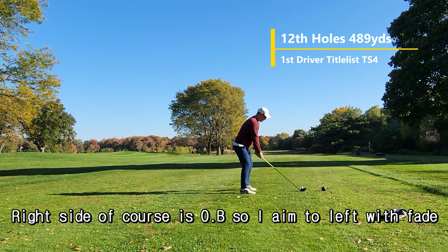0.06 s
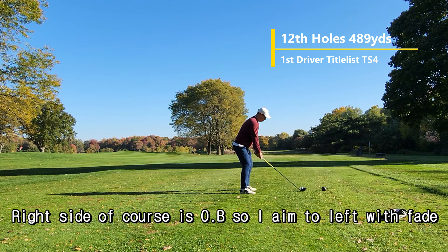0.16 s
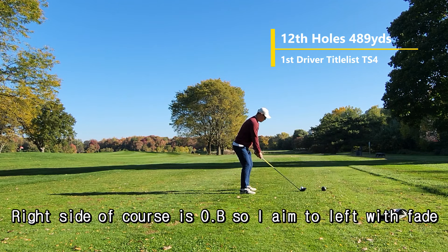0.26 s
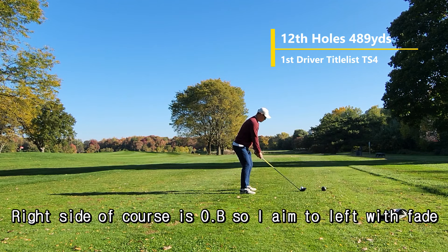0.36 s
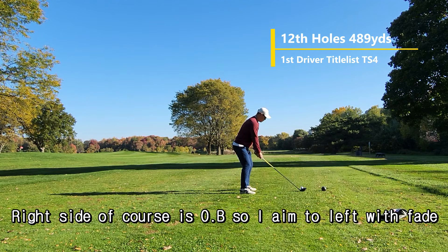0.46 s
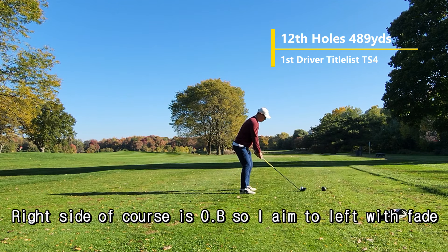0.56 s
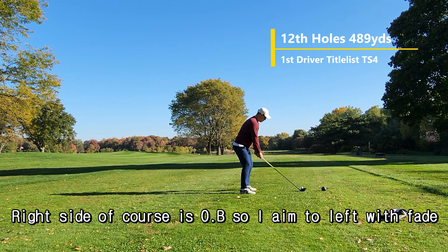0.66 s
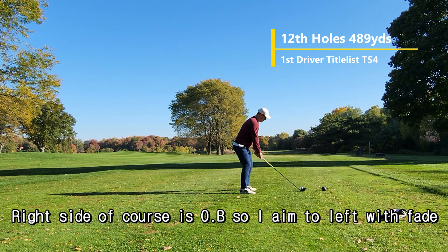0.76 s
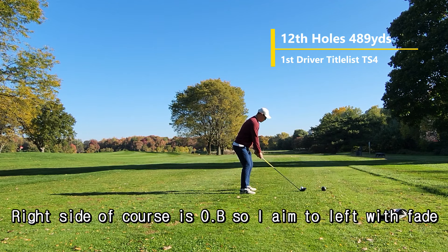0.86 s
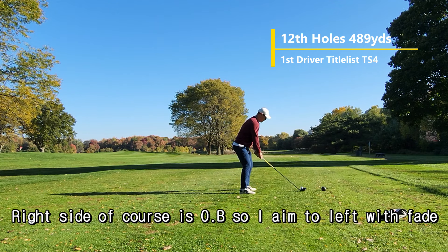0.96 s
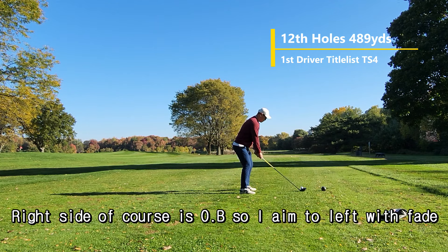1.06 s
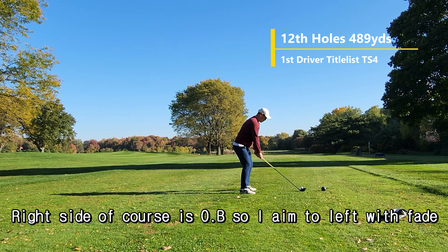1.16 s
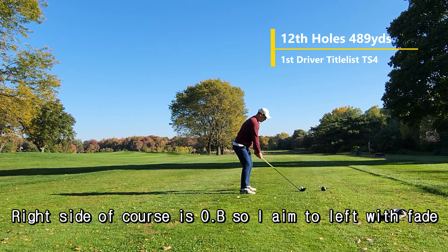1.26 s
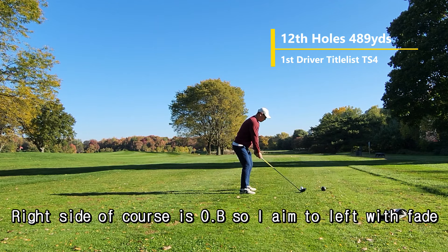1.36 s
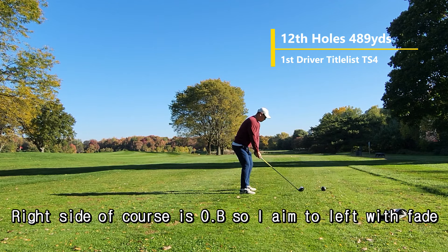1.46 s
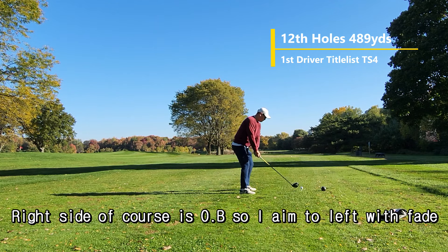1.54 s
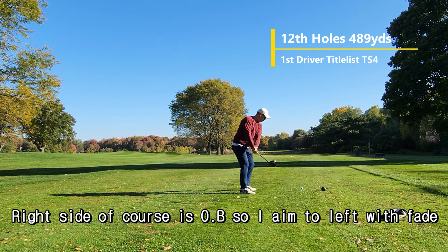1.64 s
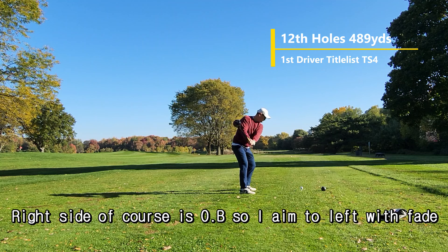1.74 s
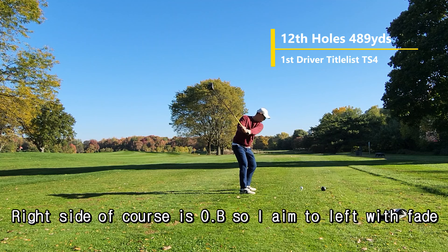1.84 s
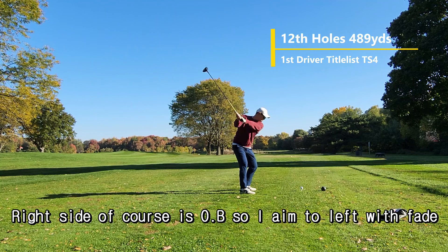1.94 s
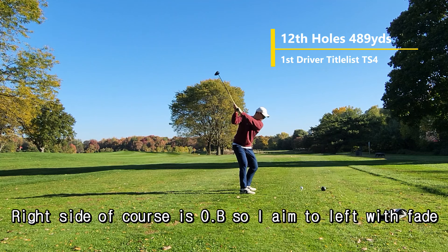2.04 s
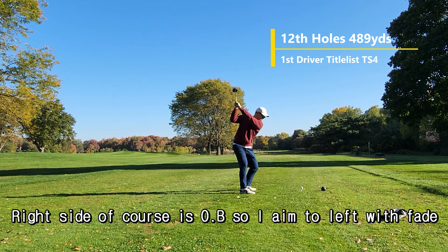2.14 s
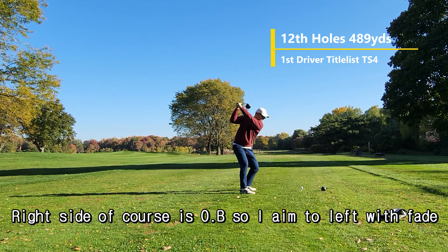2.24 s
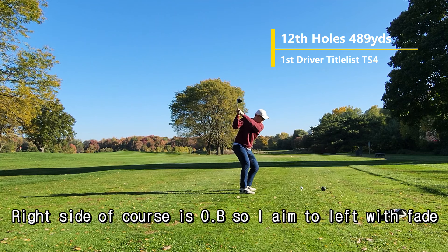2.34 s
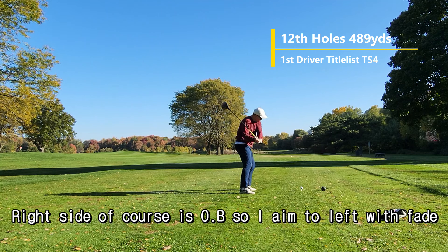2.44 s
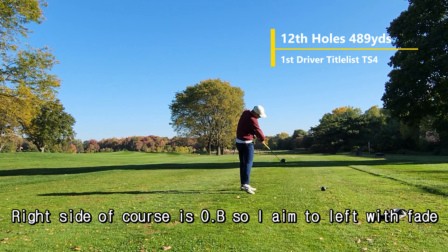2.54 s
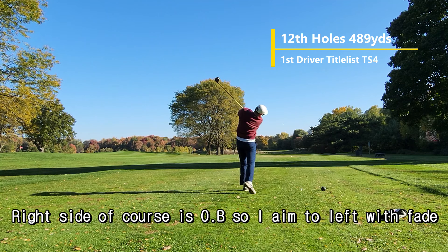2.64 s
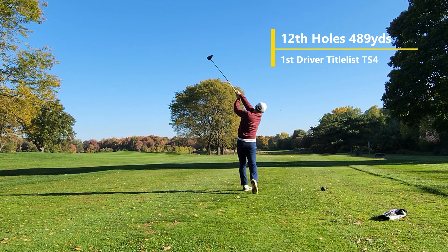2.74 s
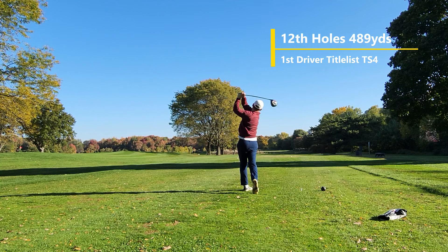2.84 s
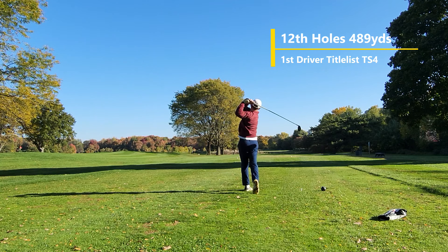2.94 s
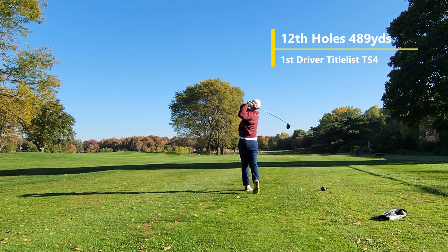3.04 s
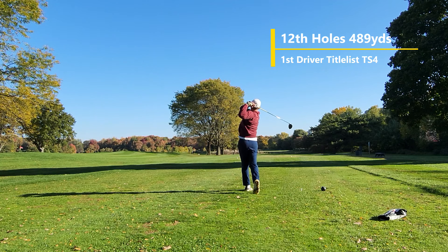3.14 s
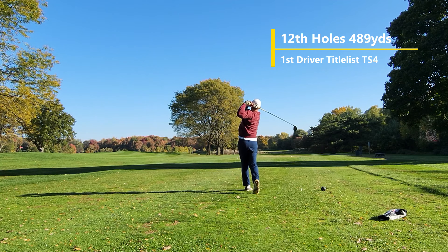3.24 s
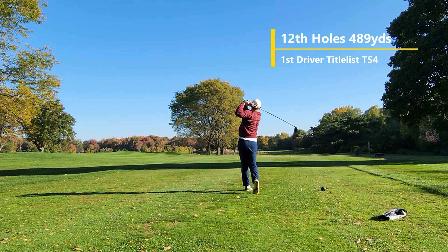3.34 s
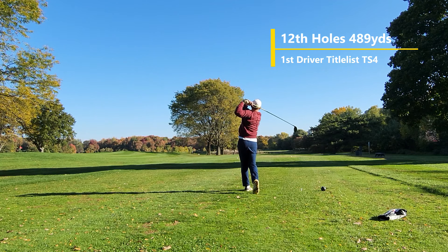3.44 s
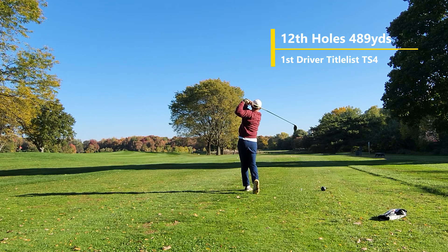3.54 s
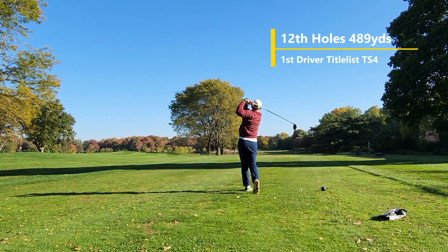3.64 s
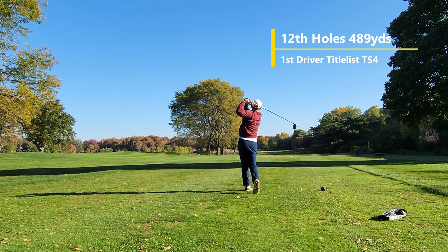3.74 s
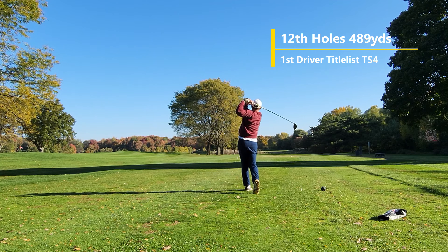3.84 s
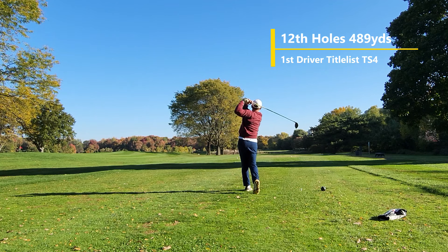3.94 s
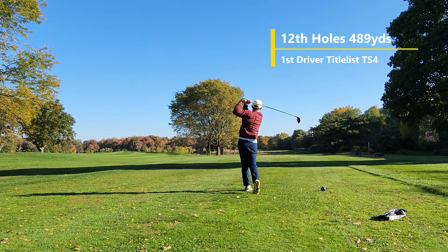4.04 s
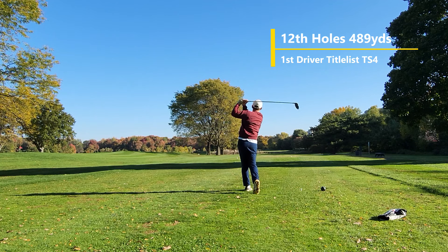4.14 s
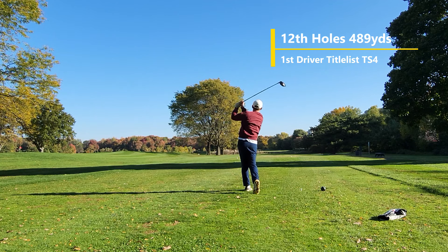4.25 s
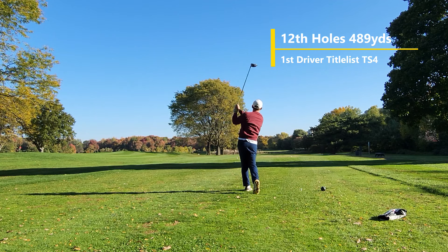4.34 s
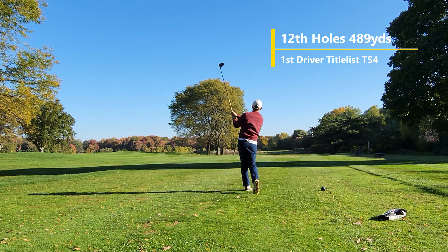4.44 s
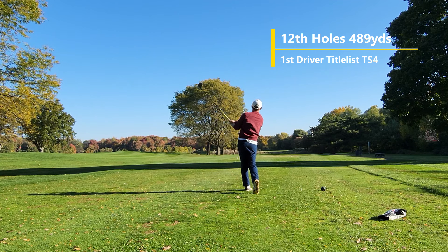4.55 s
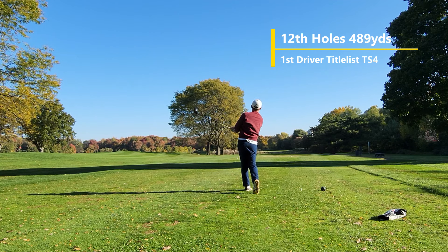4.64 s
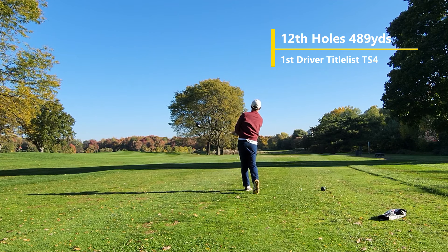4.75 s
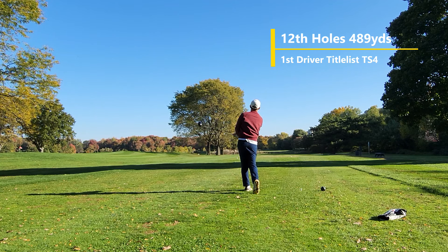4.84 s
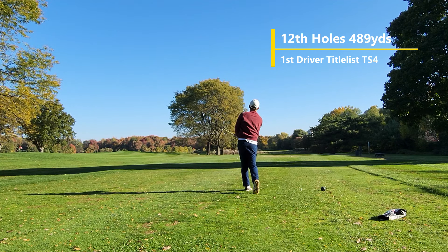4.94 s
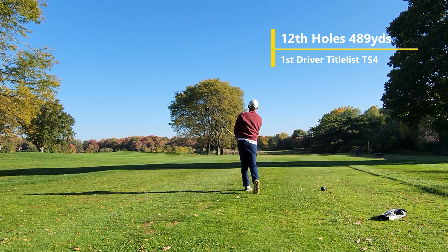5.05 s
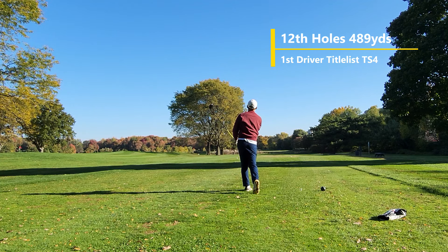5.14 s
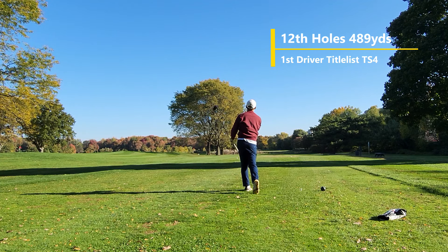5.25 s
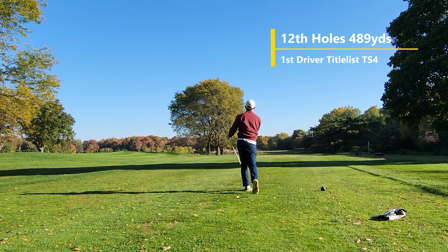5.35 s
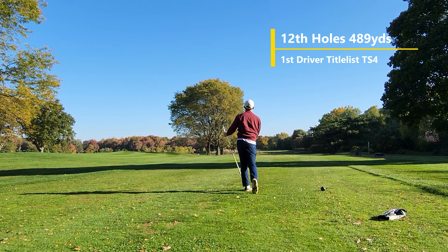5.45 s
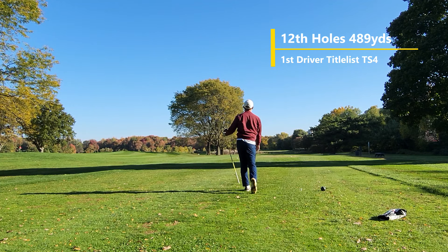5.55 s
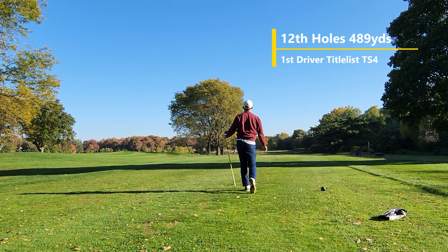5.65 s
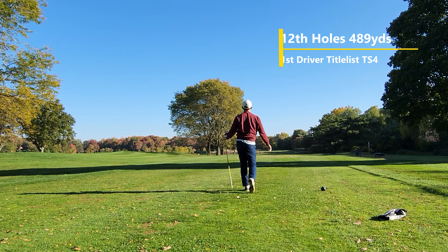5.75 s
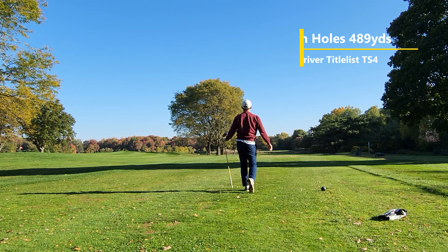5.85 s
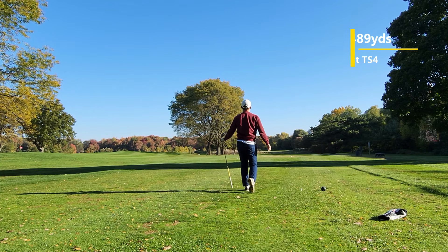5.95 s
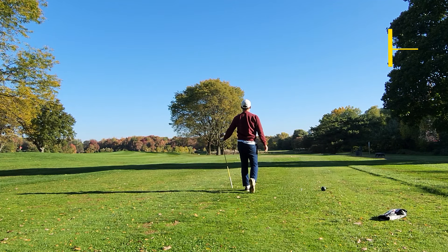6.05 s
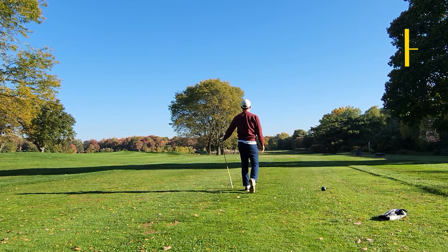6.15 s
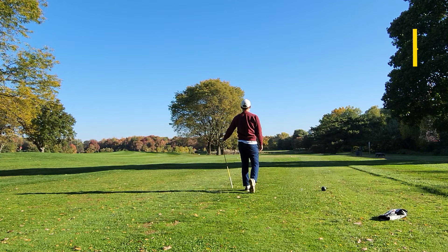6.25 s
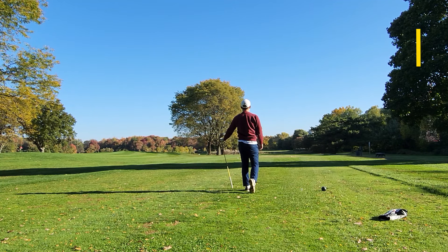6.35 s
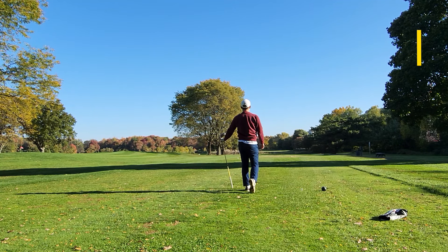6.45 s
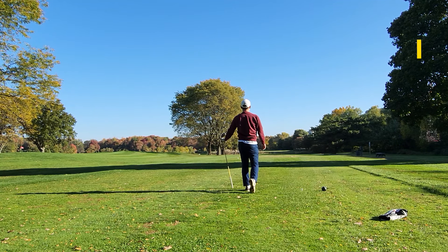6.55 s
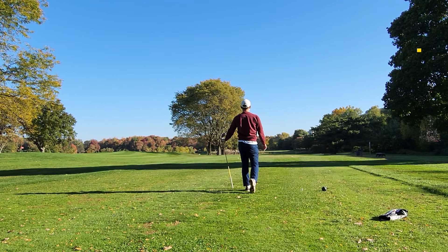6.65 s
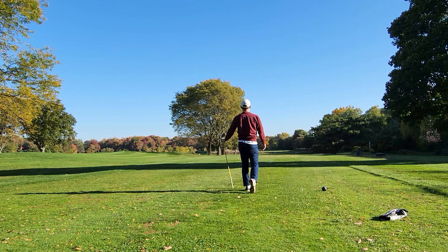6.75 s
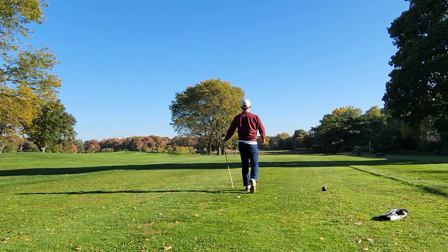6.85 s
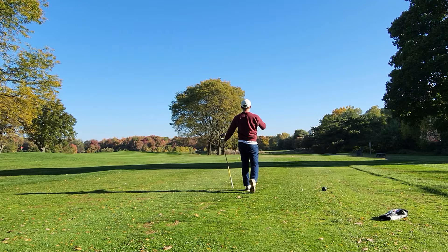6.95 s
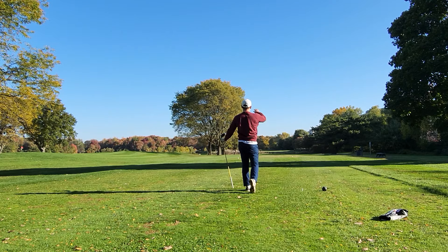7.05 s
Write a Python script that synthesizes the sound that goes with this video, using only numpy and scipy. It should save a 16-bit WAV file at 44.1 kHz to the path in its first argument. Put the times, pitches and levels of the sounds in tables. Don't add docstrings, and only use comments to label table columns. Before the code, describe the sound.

Outdoor stereo pickup a few metres behind a golfer. Low traffic rumble and faint leaf hiss hold throughout, with thin far whistles and soft chips first. A short swish leads to a hard, dry metallic click-crack of club on ball, echoed briefly by tree lines. The background dips slightly, then a clear sparrow song follows, high twitters flicker left, and distant mower and road engine tones swell.

```python
import sys
import numpy as np
from scipy import signal
from scipy.fft import rfft, irfft
from scipy.io import wavfile
from scipy.ndimage import uniform_filter1d

SR = 44100
rng = np.random.default_rng(int(sys.argv[2]) if len(sys.argv) > 2 else 0)


def unload_audio(sound):
    columns = np.transpose(np.atleast_2d(sound))
    steps = np.round(np.clip(columns, -1, 1) * 32767)
    wavfile.write(sys.argv[1], SR, steps.astype(np.int16))


def ratio_of_db(decibels):
    return 10 ** (np.asarray(decibels, float) / 20)


N = 313098

# f/Hz, level/dB, peak/ms, rise/ms, fall/ms,
# left minus right/dB
HEAD_MODES = [(2150, -17, .7, .35, .9, -1), (4200, -18, 1.2, .4, 2, -2), (3300, -25, .8, .3, 1.2, 0),
              (5450, -26, 2, .5, 4, 0), (6070, -19.5, 2.4, 1.6, 4.5, 4), (6290, -26, 2.4, 1.6, 4, 4),
              (7215, -10, .75, .25, 3.6, 0), (7840, -11, 1.3, .5, 1.2, -1), (8560, -11, 1.85, .35, 1, 1),
              (9150, -11.5, 3.7, 1.3, 2.2, 0), (9580, -26, 3.5, 1, 2.5, 0), (10400, -20, .8, .25, 2, 2),
              (10870, -21, .8, .25, 1.8, 4), (11900, -19, 1.8, .8, 2.4, 0), (13000, -16, 1.5, .4, 1.2, 0),
              (14500, -17, 1.6, .4, 1.1, 0), (15600, -29, 2.4, 1, 2.5, -3), (7780, -25, 7.5, 1.5, 6, 2),
              (6070, -24, 13.5, 1.4, 8, 6), (6290, -26, 13.5, 1.4, 11, 6)]
# f/Hz, density/dB per Hz
RATTLE_SPECTRUM = [(240, -55.5), (400, -22.5), (1130, -18), (1650, -30.5), (2180, -27), (4730, -20),
                   (6240, -6.5), (6850, -9.5), (9320, -13), (16000, -27)]
# t/s after impact, level/dB at 4 kHz, rise/s, fall/dB per s
TREE_GROUPS = [
    (.04, -38, .03, 42),
    (.056, -20, 0.011, 399),
    (.095, -22.5, 0.015, 141),
    (.165, -32.5, .03, 260),
    (.3, -48.5, 0.08, 30),
]
# f/Hz, density/dB per Hz
TREE_SPECTRUM = [(590, -36.5), (1000, -9.5), (1100, -6), (1430, -2), (3170, -5.5), (4050, 1), (5410, -0.5),
                 (6230, -2), (6600, 0.5), (12500, -13), (16200, -28)]
# t/s, level/dB
SWISH_CURVE = [
    (2.56, -77.5),
    (2.605, -56),
    (2.63, -49.5),
    (2.65, -57),
    (2.675, -41),
    (2.70, -72),
    (2.74, -67),
]
# f/Hz, density/dB per Hz
SWISH_SPECTRUM = [(300, -9), (1000, 2.5), (2200, 4), (5000, -5), (8800, -7), (15000, -26)]
# t/s, f/Hz
OPENING_PITCH = [
    [(2.845, 4740), (3.04, 4650), (3.06, 4585), (3.15, 4680), (3.357, 4670), (3.378, 4480)],
    [(3.58, 3920), (3.62, 4110), (3.76, 4170), (3.82, 4215), (4.065, 4260)],
]
OPENING_LEVEL_DB = [-57.5, -53]
# t/s, length/s, level/dB, first f/Hz, last f/Hz
SONG_NOTES = [
    (4.2, .305, -59.5, 3385, 3435),
    (4.61, .195, -60, 3370, 3366),
    (4.87, 0.061, -60, 3385, 3410),
    (4.935, 0.032, -62, 3340, 3420),
    (5.01, 0.092, -58, 3345, 3325),
    (5.13, .05, -63, 3320, 3320),
    (5.19, 0.094, -63, 3315, 3350),
    (5.28, 0.087, -56.5, 3280, 3250),
    (5.4, 0.067, -61, 3220, 3400),
    (5.48, 0.059, -68, 3300, 3240),
]
# t/s, length/s, level/dB, first f/Hz, last f/Hz
FAR_NOTES = [
    (0, 0.18, -68.5, 4120, 4086),
    (.36, 0.087, -68, 4030, 4140),
    (.568, .03, -61.5, 4300, 3720),
    (.62, .12, -80, 3650, 3480),
]
# t/s at top, level/dB, top f/Hz, drop/Hz
CHIP_CALLS = [(.405, -69, 5580, 550), (.902, -66, 5800, 990), (1.285, -72, 5680, 740),
              (1.38, -72, 7240, 150), (1.75, -66.5, 5820, 870), (2.105, -65, 5700, 498),
              (2.515, -80.5, 5520, 389), (3.78, -74, 5660, 700), (4.895, -76, 5830, 547),
              (5.795, -77, 5650, 580), (6.245, -66.5, 5560, 805), (6.635, -68.5, 5790, 970)]
# t/s at top, level/dB, top f/Hz, drop/Hz
TWITTER_CALLS = [
    (4.205, -71, 9000, 2680),
    (4.268, -68.5, 8450, 2700),
    (4.342, -77, 8520, 2395),
    (4.82, -68.5, 9050, 2230),
    (4.878, -65, 8720, 2350),
    (6.567, -68, 8660, 2630),
    (6.629, -63, 8880, 2630),
]
# t/s, peak level/dB
LEAF_TICKS = [
    (1.476, -52),
    (5.684, -49),
]
# t/s, peak level/dB, half length/s
MOWER_SWELLS = [(1.648, -51.5, 0.15), (2.376, -52, 0.13), (2.84, -52.5, 0.14), (3.674, -50.5, 0.1),
                (4.068, -50, .1), (4.42, -47, 0.14), (4.806, -43.5, 0.15), (5.158, -49.5, .12),
                (5.381, -48.5, 0.05), (6.249, -54, 0.32), (6.71, -44, .12), (6.897, -49.5, .06)]
# t/s, peak level/dB, half length/s, f/Hz
ROAD_DRONES = [
    (.55, -51, 0.56, 125.5),
    (5.65, -44.5, 0.42, 167),
    (6.85, -43.5, 0.61, 169.8),
]
# t/s, swell/dB, half length/s
ROAD_PASSES = [
    (1.296, 0.5, 0.47),
    (5.073, 3.5, 0.16),
    (7.1, 2, .3),
]
# f/Hz, density/dB per Hz
RUMBLE_SPECTRUM = [(12, -41.5), (20, -17), (49, 1), (76, 4), (124, -9.5), (167, -11.5), (244, -19),
                   (329, -23), (365, -26), (450, -38), (580, -62), (990, -120)]
# f/Hz, density/dB per Hz
ROAR_SPECTRUM = [(180, -37.5), (300, -6), (364, -4), (458, -8.5), (714, -7.5), (1430, -13.5), (2520, -30),
                 (3000, -33.5), (3900, -51), (6600, -120)]
# f/Hz, density/dB per Hz
LEAF_SPECTRUM = [(1410, -26), (2400, -11), (2940, -4), (3380, -1.5), (4810, -3.5), (5400, -2.5),
                 (6620, -7.5), (7500, -5.5), (8840, -10), (11100, -28.5), (15500, -27.5)]
# f/Hz, correlation/1
PORT_LIKENESS = [(60, 0.98), (130, 0.99), (290, 0.92), (640, 0.76), (1410, 0.065), (3100, 0.07),
                 (6820, 0.13), (15000, 0.04)]
# f/Hz, left minus right/dB
PORT_TILT = [(60, 1.1), (180, 1.3), (550, 2.2), (1650, 3.5), (5000, 6), (15000, 1.5)]

IMPACT_S, SQUASH_MS, SQUASH_DB = 2.6763, .14, -7
CROWN_LOW_HZ, CROWN_HIGH_HZ = 5000, 12000
CROWN_LATE_US, SOLE_LATE_US = 5, -8
RATTLE_DB, RATTLE_T60_S = -11, 0.036
NEAR_LOSS_DB, LOSS_DB_PER_S, FAR_LOSS_DB = -3.5, 33.5, 11
SHAFT_HZ, SHAFT_HZ_PER_DB, SHAFT_DB = 860, 17, 2
SWELL_DB_PER_S, FLICK_HZ_PER_S, FLICK_S = 8, 250, .025
WOBBLE_SHARE = .003
SEET_S, SEET_LENGTH_S, SEET_DB = .508, 0.11, -62
SEET_TOP_HZ, SEET_END_HZ, SEET_SETTLE_S = 9150, 7600, 0.015
CHIP_CLIMB_S, CHIP_FALL_S = .014, .032
TWITTER_CLIMB_S, TWITTER_FALL_S = 0.0097, .029
MOWER_HZ, MOWER_HZ_PER_S, LOAD_SAG_HZ, LOAD_S = 346, 4.2, 6.08, 5.2
RUMBLE_DB, ROAR_DB, HISS_DB = -30, -47.5, -64.5
TRAFFIC_DB_PER_S, BREEZE_DB_PER_S = 0.35, -.5
DUCK_DB, DUCK_S = -3.5, 0.32
EDGE_HZ = 16000


def strike():
    ms = np.arange(SR // 4) * 1000 / SR
    u = (ms - 2.6 * SQUASH_MS) / SQUASH_MS
    sound = np.tile(-ratio_of_db(SQUASH_DB) * u * np.exp(.5 - u ** 2 / 2), (2, 1))
    for hz, db, peak_ms, rise_ms, fall_ms, left_db in HEAD_MODES:
        left_us = CROWN_LATE_US if CROWN_LOW_HZ < hz < CROWN_HIGH_HZ else SOLE_LATE_US
        late_ms = ms - peak_ms - np.outer([.5, -.5], left_us / 1000)
        rising = -(late_ms / rise_ms) ** 2 / 2
        falling = -abs(late_ms / fall_ms) ** 1.4
        flash = np.exp(np.where(late_ms < 0, rising, falling))
        level = ratio_of_db(db + np.outer([.5, -.5], left_db))
        sound += level * flash * np.cos(2 * np.pi * hz * late_ms / 1000)
    shared, left, right = rng.standard_normal((3, len(ms)))
    rattle = evened(coloured(shared + .5 * np.array([left, right]), RATTLE_SPECTRUM))
    decay = ratio_of_db(RATTLE_DB - ms * 60 / 1000 / RATTLE_T60_S)
    sound += decay * (1 - np.exp(-ms / 2)) * rattle
    out = np.zeros((2, N))
    add(out, IMPACT_S, sound)
    return out


def tree_echo(crack):
    hz, t, z = signal.stft(rng.standard_normal((2, SR)), SR, nperseg=256)
    level = 0
    for s, db, rise_s, fall_db_per_s in TREE_GROUPS:
        decay = ratio_of_db(db - fall_db_per_s * np.maximum(t - s, 0))
        level = level + decay * bump(np.minimum(t, s), s, rise_s)
    near_s = TREE_GROUPS[1][0]
    path_s = np.maximum(t - near_s, 3 * (near_s - t))
    loss_db = np.minimum(NEAR_LOSS_DB + LOSS_DB_PER_S * path_s, FAR_LOSS_DB)
    treble_loss = ratio_of_db(-np.outer(2.4 * ((hz / 4000) ** .6 - 1), loss_db))
    z = z * level * treble_loss * (t > .01)
    tail = signal.istft(z, SR, nperseg=256)[1] * ratio_of_db(np.array([[-10], [-12]]))
    ring = resonate(crack, np.full(N, 6200.), 350)
    out = ratio_of_db(-18.5) * signal.fftconvolve(ring[None], tail, axes=1)[:, :N]
    add(out, IMPACT_S, coloured(tail, TREE_SPECTRUM))
    return out


def swish():
    t = np.arange(SWISH_CURVE[0][0], SWISH_CURVE[-1][0], 1 / SR)
    hiss_db, = along(SWISH_CURVE, t)
    shaft_hz = SHAFT_HZ + SHAFT_HZ_PER_DB * (hiss_db - hiss_db.max())
    shared, left, right = rng.standard_normal((3, len(t)))
    hiss = evened(coloured(shared + .7 * np.array([left, right]), SWISH_SPECTRUM))
    shaft = evened(resonate(shared, shaft_hz, 250))
    out = np.zeros((2, N))
    add(out, t[0], ratio_of_db(hiss_db) * (hiss + ratio_of_db(SHAFT_DB) * shaft))
    return out * ratio_of_db(np.array([[1.4], [-1.4]]))


def birds():
    song = opening() + sung(SONG_NOTES)
    far = sung(FAR_NOTES)
    seet = thin_call()
    seet = seet + ratio_of_db(-11) * np.roll(seet, round(.052 * SR))
    chip = arches(CHIP_CALLS, CHIP_CLIMB_S, CHIP_FALL_S, 35000, 4.2)
    twitter = arches(TWITTER_CALLS, TWITTER_CLIMB_S, TWITTER_FALL_S, 110000, 3.5)
    out = placed(song, .474, .8) + ratio_of_db(-14) * foliage(song, .5, .03)
    out += placed(seet, .465, -1.3) + ratio_of_db(-5.5) * foliage(seet, .3, 0.018)
    out += placed(far, -0.035, 2.1) + ratio_of_db(-1) * foliage(far, 0.35, 0.017)
    out += placed(chip, .4, -2.2) + ratio_of_db(3) * foliage(chip, .45, .005)
    twitter_echo = foliage(twitter, .4, 0.011) * ratio_of_db(np.array([[2.5], [-2.5]]))
    return out + placed(twitter, -.3, 10.4) + ratio_of_db(-0.5) * twitter_echo


def opening():
    out = np.zeros(N)
    for rows, db in zip(OPENING_PITCH, OPENING_LEVEL_DB):
        t = np.arange(rows[0][0], rows[-1][0], 1 / SR)
        note(out, rows[0][0], along(rows, t)[0], db)
    return out


def sung(rows):
    out = np.zeros(N)
    for s, length_s, db, first_hz, last_hz in rows:
        t = np.arange(0, length_s, 1 / SR)
        flick_hz = FLICK_HZ_PER_S * length_s * bump(t, length_s, FLICK_S)
        note(out, s, first_hz + (last_hz - first_hz) * t / length_s + flick_hz, db)
    return out


def thin_call():
    out, t = np.zeros(N), np.arange(0, SEET_LENGTH_S, 1 / SR)
    hz = SEET_END_HZ + (SEET_TOP_HZ - SEET_END_HZ) * np.exp(-t / SEET_SETTLE_S)
    note(out, SEET_S, hz, SEET_DB)
    return out


def arches(calls, climb_s, fall_s, climb_hz_per_s, waver_db):
    out = np.zeros(N)
    t = np.arange(-climb_s, fall_s, 1 / SR)
    for s, db, top_hz, drop_hz in calls:
        corners_hz = [top_hz - climb_hz_per_s * climb_s, top_hz, top_hz - drop_hz]
        hz = uniform_filter1d(np.interp(t, [-climb_s, 0, fall_s], corners_hz), size=250)
        add(out, s - climb_s, whistle(hz, db, 0.26, waver_db))
    return out


def note(out, s, hz, db):
    t = np.arange(len(hz)) / SR
    level_db = db + SWELL_DB_PER_S * (t - t[-1] / 2)
    add(out, s, whistle(hz, level_db, min(1600 / len(t), 1), 1.14))


def whistle(hz, db, fade, waver_db=1.5):
    quick, slow = rng.standard_normal((len(hz), 2)).T
    waver = evened(uniform_filter1d(quick, size=200))
    wobble = evened(uniform_filter1d(slow, size=700))
    turns = np.cumsum(hz * (1 + WOBBLE_SHARE * wobble)) / SR
    level = np.sqrt(2) * ratio_of_db(db + waver_db * waver)
    return level * np.sin(2 * np.pi * turns) * signal.windows.tukey(len(hz), fade)


def foliage(x, t60_s, gap_s):
    t = np.arange(SR // 2) / SR
    tail = rng.standard_normal((2, len(t))) * ratio_of_db(-60 * t / t60_s) * (t > gap_s)
    return signal.fftconvolve(x[None], tail / np.linalg.norm(tail[0]), axes=1)[:, :N]


def ticks():
    out, t = np.zeros(N), np.arange(200) / SR
    colour = [(500, -4), (2000, 4), (6000, 2), (9000, -8), (12000, -30)]  # f/Hz, density/dB per Hz
    for s, db in LEAF_TICKS:
        add(out, s, ratio_of_db(db - 60 * t / .01) * coloured(rng.standard_normal(len(t)), colour))
    return placed(out, 0, .5)


def hums():
    t = np.arange(N) / SR
    sag_hz = LOAD_SAG_HZ * bump(t, LOAD_S, 0.298)
    late_drop_hz = 0.66 * np.maximum(t - 4, 0) ** 1.3
    hz = MOWER_HZ + MOWER_HZ_PER_S * t - sag_hz - late_drop_hz
    out = engine_tone(hz) * sum(ratio_of_db(db) * bump(t, s, half_s) for s, db, half_s in MOWER_SWELLS)
    for s, db, half_s, drone_hz in ROAD_DRONES:
        out += ratio_of_db(db) * bump(t, s, half_s) * engine_tone(np.full(N, float(drone_hz)))
    return placed(out, 0.24, 2.2)


def engine_tone(hz):
    blurred = resonate(resonate(rng.standard_normal(N), hz, 9.8), hz, 27.0)
    return 0.45 * evened(blurred) + 1.11 * np.sin(2 * np.pi * np.cumsum(hz) / SR)


def background():
    t = np.arange(N) / SR
    duck_db = DUCK_DB * np.clip((t - IMPACT_S) / DUCK_S, 0, 1)
    traffic_db = TRAFFIC_DB_PER_S * np.maximum(t - IMPACT_S - DUCK_S, 0)
    passes_db = sum(db * bump(t, s, half_s) for s, db, half_s in ROAD_PASSES)
    late_ms = 8000 / SR
    rumble = ratio_of_db(RUMBLE_DB + 1.5 * traffic_db + passes_db) * wash(RUMBLE_SPECTRUM, .8, late_ms)
    roar = ratio_of_db(ROAR_DB + 2.57 * np.tanh(traffic_db / 1.03)) * wash(ROAR_SPECTRUM, 0.74, late_ms)
    hiss = ratio_of_db(HISS_DB + 2.6 * np.exp(BREEZE_DB_PER_S * t * 2)) * wash(LEAF_SPECTRUM, .9)
    return ratio_of_db(duck_db) * (rumble + roar + ratio_of_db(0.378 * duck_db) * hiss)


def wash(colour, patchy_db, left_late_ms=0):
    frames, hz = N // 512 + 6, np.fft.rfftfreq(2048, 1 / SR)
    a, b, c, d, patches = rng.standard_normal((frames, len(hz), 5)).T
    patches = uniform_filter1d(patches, size=20, axis=0)
    patches = evened(uniform_filter1d(patches, size=10, axis=1))
    same = np.clip(read(PORT_LIKENESS, hz), -1, 1)[:, None]
    left = a + 1j * b
    right = same * left + np.sqrt(1 - same ** 2) * (c + 1j * d)
    z = np.array([left, right])
    z[0] *= np.exp(-2j * np.pi * hz * left_late_ms / 1000)[:, None]
    colour_db = read(colour, hz) + np.outer([.5, -.5], read(PORT_TILT, hz))
    z = z * ratio_of_db(colour_db[..., None] + patchy_db * patches)
    return evened(signal.istft(z, nperseg=2048, noverlap=1536)[1][:, :N])


def placed(x, left_late_ms, left_db):
    hz, side = np.fft.rfftfreq(N, 1 / SR), np.array([[.5], [-.5]])
    delay = np.exp(-2j * np.pi * hz * side * left_late_ms / 1000)
    return irfft(rfft(x) * delay * ratio_of_db(side * left_db), N)


def resonate(x, hz, width_hz):
    turn = np.exp(2j * np.pi * np.cumsum(hz) / SR)
    r = np.exp(-np.pi * width_hz / SR)
    return 2 * (turn * signal.lfilter([1 - r], [1, -r], x / turn)).real


def coloured(x, points):
    size = x.shape[-1]
    return irfft(rfft(x) * ratio_of_db(read(points, np.fft.rfftfreq(size, 1 / SR))), size)


def read(points, hz):
    f, value = np.transpose(points)
    return np.interp(np.log(hz + 1), np.log(f + 1), value)


def along(rows, t):
    s, *columns = np.transpose(rows)
    return [np.interp(t, s, c) for c in columns]


def bump(t, s, half_s):
    return np.exp(-((t - s) / half_s) ** 2)


def evened(x):
    return x / np.sqrt(np.mean(x ** 2) + 1e-20)


def add(mix, s, sound):
    part = mix[..., round(s * SR):][..., :sound.shape[-1]]
    part += sound[..., :part.shape[-1]]


def scene():
    crack = strike()
    club = placed(crack, 4400 / SR, 0) + tree_echo(crack.mean(0)) + swish()
    return club + birds() + ticks() + hums() + background()


def low_pass(x):
    return signal.sosfilt(signal.butter(12, 16330, fs=SR, output="sos"), x)


def record(dry):
    band = [(5800, -40), (7000, 0), (9300, 0), (10500, -14), (16000, -14)]  # f/Hz, level/dB
    ahead = np.linspace(1, .15, 900) * coloured(rng.standard_normal(900), band)
    backwards = dry[:, ::-1]
    lead_in = signal.fftconvolve(backwards, evened(ahead)[None] / 60, axes=1)[:, :N][:, ::-1]
    lowpass = signal.firwin(255, EDGE_HZ, fs=SR)[None]
    mix = signal.oaconvolve(dry + ratio_of_db(-20.5) * lead_in, lowpass, "same")
    return low_pass(mix)


dry = scene()
out = record(dry)
unload_audio(out)
```